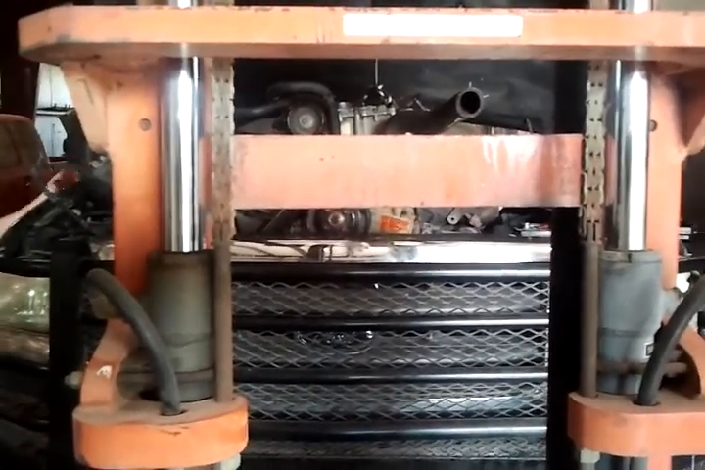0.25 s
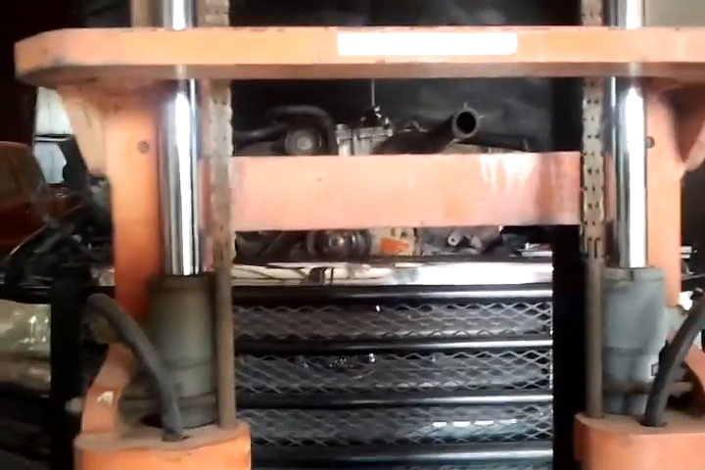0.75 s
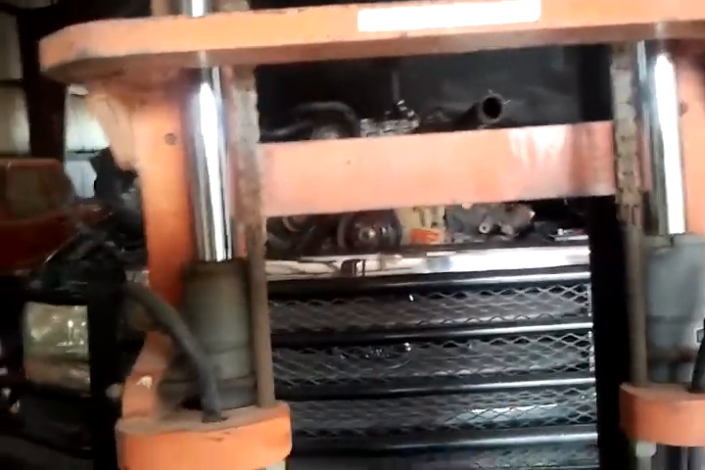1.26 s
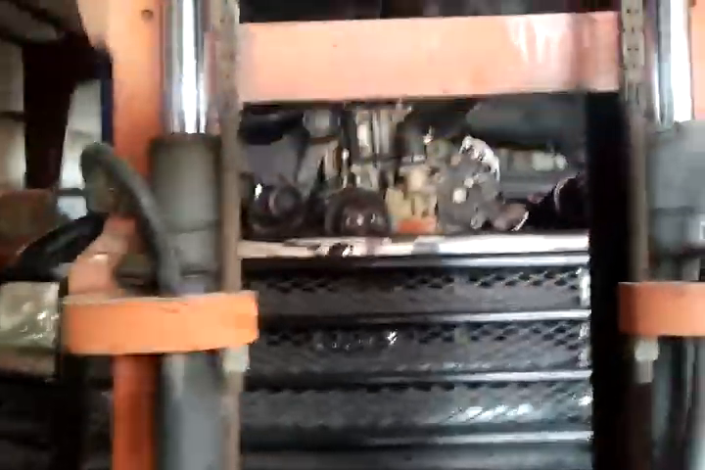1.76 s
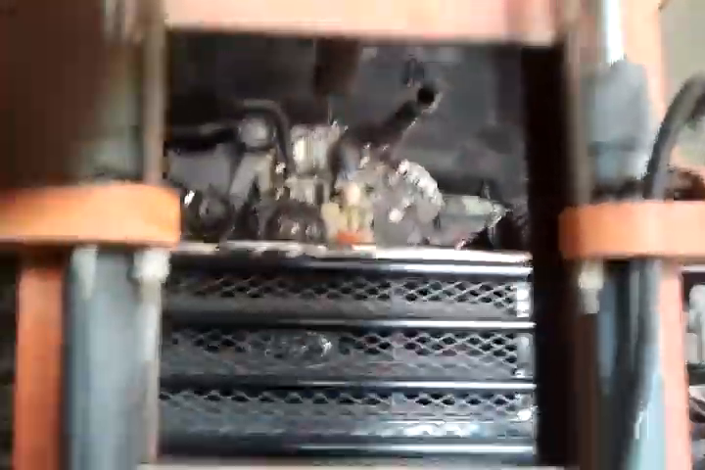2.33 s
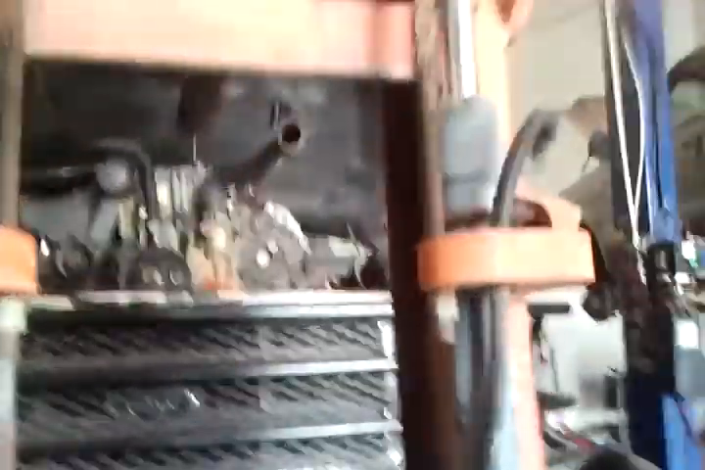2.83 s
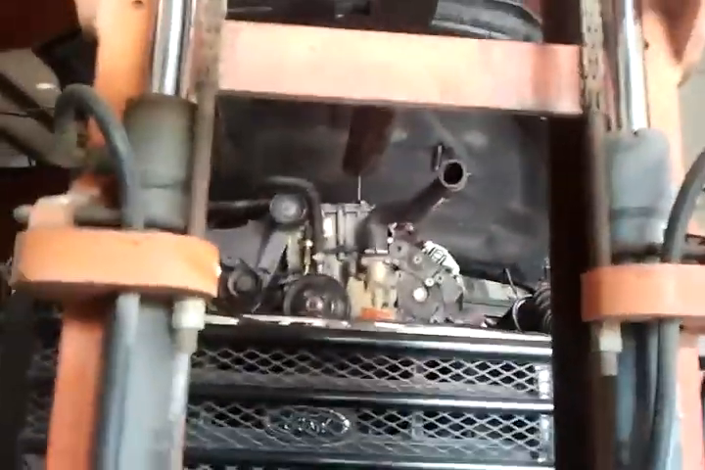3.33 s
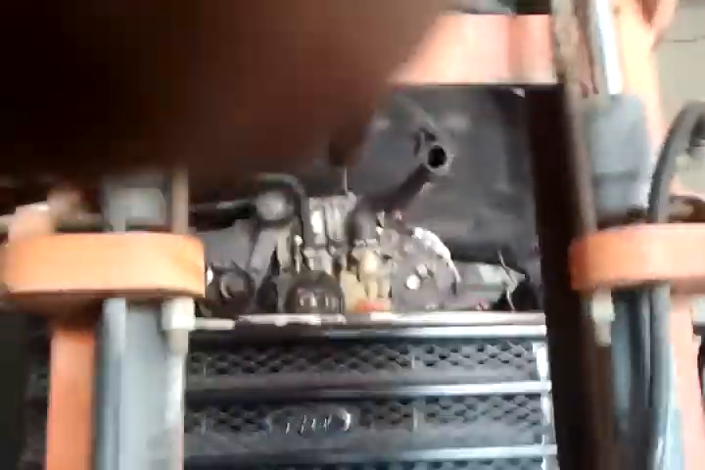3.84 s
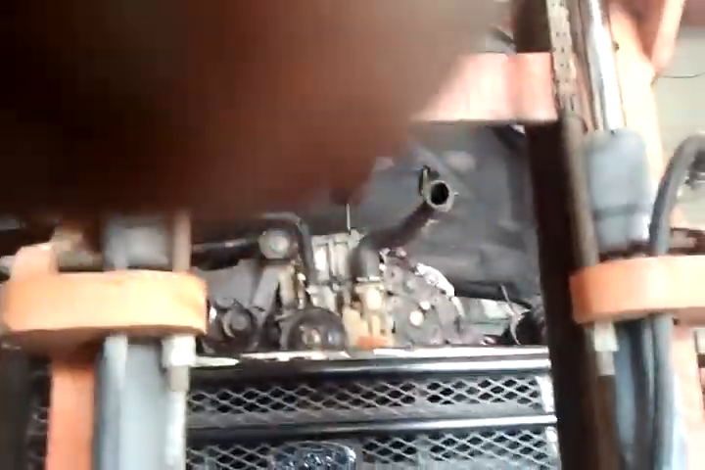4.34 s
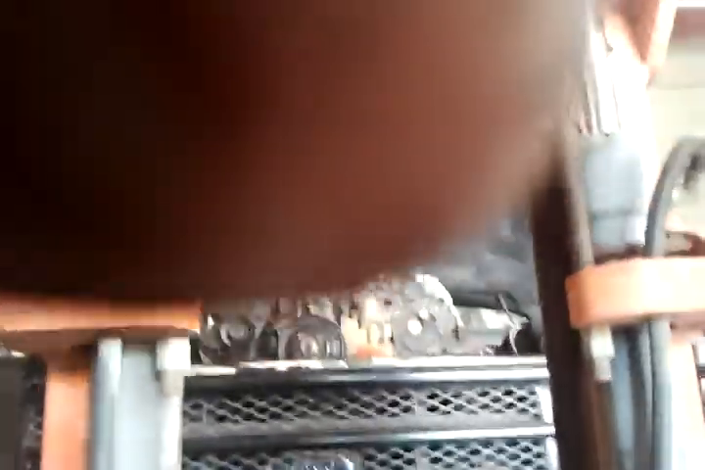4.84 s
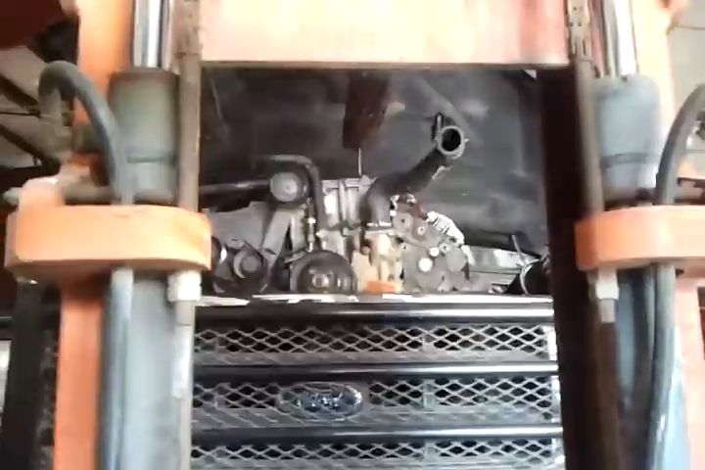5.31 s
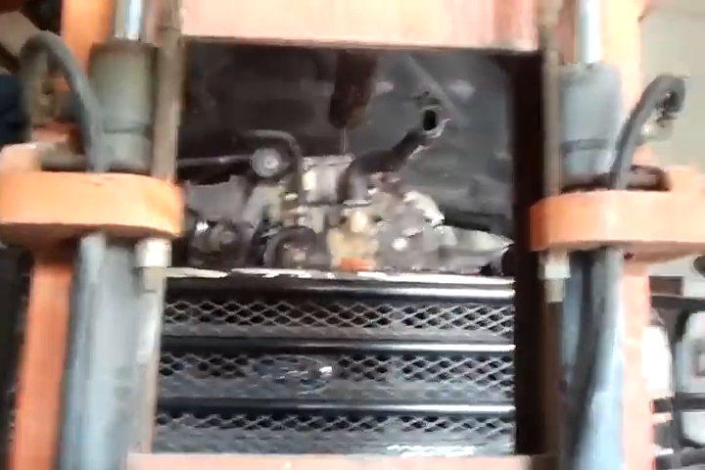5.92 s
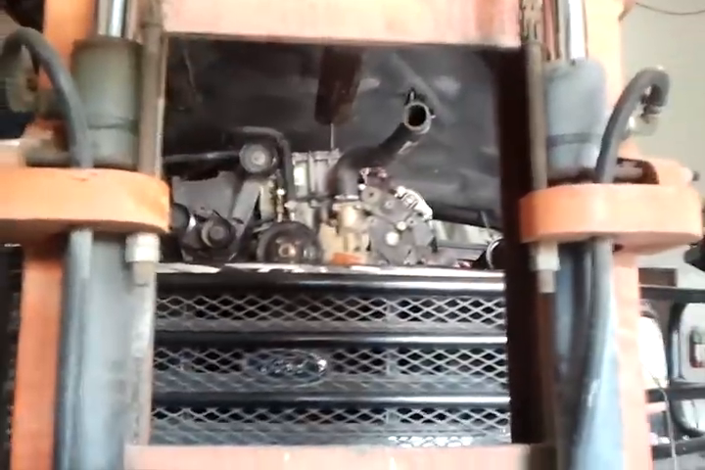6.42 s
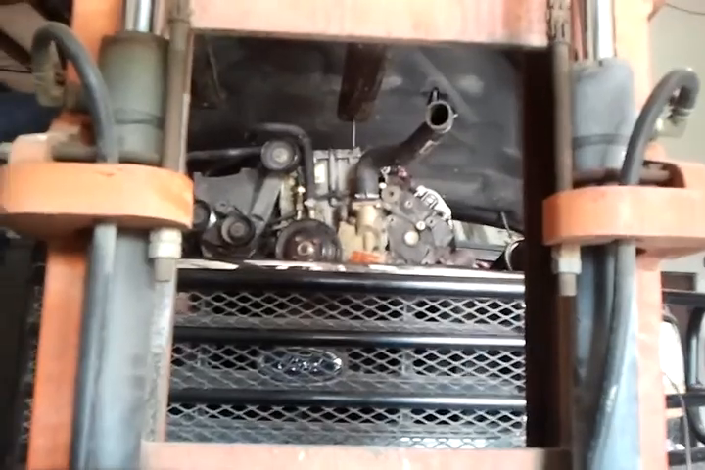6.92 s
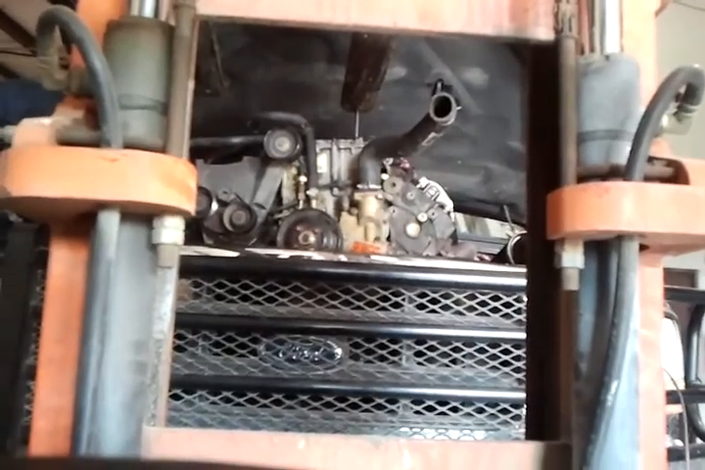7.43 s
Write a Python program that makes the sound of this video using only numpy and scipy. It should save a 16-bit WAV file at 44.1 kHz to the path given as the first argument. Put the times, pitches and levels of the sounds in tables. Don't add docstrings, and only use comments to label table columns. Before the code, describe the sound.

A forklift engine holds a steady fast idle, heard close to its grille on a handheld phone in a workshop. Low firing hum, beating fan note and hydraulic pump whine blend under a broad roar of cooling air. The tone shifts slightly as the hand moves, with hiss briefly brightening around two and five seconds. Near six seconds the sound drops to silence, then fades back unchanged.

```python
import sys
import numpy as np
from scipy import signal
from scipy.fft import rfft, irfft, next_fast_len
from scipy.io import wavfile
from scipy.ndimage import uniform_filter1d, map_coordinates

SR = 44100
rng = np.random.default_rng(int(sys.argv[2]) if len(sys.argv) > 2 else 0)


def int16_out(signal):
    q = np.round(np.clip(np.atleast_2d(signal).T, -1, 1) * 32767)
    wavfile.write(sys.argv[1], SR, q.astype(np.int16))


def magnitude_from_level(level_db):
    exponent = np.asarray(level_db, float) / 20
    return 10 ** exponent


N = 338247
TIME = np.arange(N) / SR

FIRING, FAN, PUMP = 4, 11.39, 22.5

# start_s, end_s
HEARD_SPANS = [
    (0, 5.9133),
    (6.5632, 7.67),
]
# time_s, camshaft_turns_per_minute
CAM_SPEED = [(0.0, 1059), (0.28, 1064), (0.84, 1064), (1.13, 1054), (1.41, 1057), (1.97, 1055.5),
             (2.25, 1045), (2.81, 1049), (3.18, 1058), (3.66, 1050), (4.22, 1050.5), (4.78, 1063),
             (5.35, 1059), (5.91, 1062), (6.84, 1067), (7.12, 1057), (7.39, 1064.5), (7.67, 1053)]
WEAK_ORDERS = (5, 7, 9, 10, 11, 13, 14, 15, 16, 18, 21, 23, 24, 25, 27, 28, 29, 30, 32, 33, 38, 39, 40, 43,
               44, 46, 49, 52, 53, 54, 56, 57, 61, 63, 65, 68, 76.5, 80, 108, 150)
WEAK_ORDER_DB = (-49, -56, -52, -48, -46, -52, -46, -39, -40, -47, -53, -46, -53, -51, -51, -51, -51, -51,
                 -52, -48, -49, -51, -49, -48, -50, -52, -52, -51, -52, -49, -51, -50, -54, -55, -55, -52,
                 -49, -53, -52, -52)
# frequency_hz, level_db_per_hz
AIR_SPECTRUM = [(20, -31.5), (45, -25.5), (80, -13.5), (130, -8), (175, -1.5), (250, 5), (310, -2),
                (520, 0), (700, -3), (1100, -5), (1700, -8.5), (3000, -10), (5000, -12), (8000, -13)]
# frequency_hz, width_hz, gain_db
BAY_CAVITIES = [(580, 20, 3), (914, 60, 2.5), (1368, 80, 2), (1970, 110, 2.5), (2665, 360, 4.5),
                (3430, 160, 2), (3840, 230, 2), (4890, 80, 2), (6260, 290, 2), (7530, 200, 3.5),
                (1490, 75, 1.5), (2380, 80, 3), (5500, 80, 0)]
# delay_ms, level_db
ECHOES = [(2.9, -20), (6.3, -19), (10.7, -18), (17.9, -17), (27.3, -17)]
# time_s, turn_to_air_stream, height_over_grille, depth_into_mast
HAND_PATH = [(0.3, -.23, -0.077, -.38), (1.55, -.33, -0.035, -.3), (1.75, -.29, -.03, -0.43),
             (2.05, -0.19, .48, -0.05), (2.3, .02, .49, -.22), (2.45, 0.034, .56, 0.35),
             (3.0, .06, .23, 0.077), (3.3, .11, .02, 0.31), (3.8, -.03, .17, -0.035),
             (4.0, 0.25, .12, -.23), (4.35, .25, .15, .02), (4.6, 0.24, -.44, .39), (4.9, .28, -.4, .27),
             (5.2, 0.52, -0.18, 0.26), (5.75, 0.71, -0.079, 0.2), (6.9, -.43, .16, .08),
             (7.05, -0.42, .06, .6), (7.5, -0.36, .1, .38)]
# mean_level_db, turn_db_per_unit, height_db_per_unit, depth_db_per_unit
FIRING_NOTE = (-37.5, -1.3, -4.5, 3.5)
FIRING_OCTAVE = (-46.5, 3.7, 3, 10.5)
FIRING_THIRD = (-25, -2.7, -0.5, 2.3)
FAN_NOTE = (-25, 4.5, 7.5, -3.5)
FAN_OCTAVE = (-38.5, -3.5, -5, -1)
PUMP_NOTE = (-28.5, .3, 0, 8.5)
PUMP_OCTAVE = (-30.5, -.3, 11, 0.1)
# time_s, half_length_s, gain_db
FAN_NODES = [(0.23, .2, -1.5), (3.42, .22, -4), (4.65, .2, -1), (5.25, .17, -8), (5.8, .25, -6.5),
             (7.11, .14, -3)]
BEAM_HZ = (570, 1250, 2300, 4400, 6400, 7800)
BEAMING = [(-0.1, -1.1, 1.5), (-.5, 0.5, .6), (3.5, 6.5, .6), (8.5, -1.7, .3), (7.5, 0.5, 1.1),
           (5.5, 5, 5.4)]
# time_s, half_length_s, gain_db
FINGER_SLIDES = [
    (1.953, .15, 3),
    (2.38, .2, 1.1),
    (5.067, 0.25, 6.5),
]
# time_s, level_db
SHORT_HISS = [(5.914, -43.5), (5.94, -41), (5.96, -46.5), (5.977, -48), (5.985, -61.5), (5.992, -87),
              (6.0, -95)]
# frequency_hz, gain_db
PHONE_TOP = [(7200, 0), (7900, -6), (8500, -17), (8900, -33), (9150, -42.5), (9300, -68), (9600, -120)]


def curves(table):
    s, *columns = np.transpose(table)
    return [np.interp(TIME, s, column) for column in columns]


def colour(points, hz):
    f, db = np.transpose(points)
    return np.interp(np.log(hz + 1), np.log(f), db)


def walk(rate_hz):
    hold = int(SR / rate_hz)
    steps = np.repeat(rng.standard_normal(N // hold + 1), hold)
    return 1.83 * uniform_filter1d(uniform_filter1d(steps, hold), hold)[:N]


def bumps(events):
    return sum(db * np.clip(1 - abs(TIME - s) / half, 0, 1) for s, half, db in events)


def after_dropout(length_s):
    resumed_s = TIME - HEARD_SPANS[1][0]
    return (TIME > HEARD_SPANS[0][1]) * np.clip(1 - resumed_s / length_s, 0, 1)


def level_at_hand(note):
    return note[0] + np.dot(note[1:], curves(HAND_PATH))


def tone(turns, db):
    return np.sqrt(2) * magnitude_from_level(db) * np.sin(2 * np.pi * turns)


def camshaft():
    turns = np.cumsum(curves(CAM_SPEED)[0]) / (60 * SR)
    late = TIME >= HEARD_SPANS[1][0]
    return turns - late * turns[np.argmax(late)], late


def engine(turns):
    firing_db = level_at_hand(FIRING_NOTE) + 2 * after_dropout(.5)
    third_db = level_at_hand(FIRING_THIRD) + .4 * bumps(FAN_NODES)
    out = tone(FIRING * turns + rng.random(), firing_db)
    out += tone(2 * FIRING * turns + rng.random(), level_at_hand(FIRING_OCTAVE))
    out += tone(3 * FIRING * turns, third_db + .4 * walk(9))
    swell_db = third_db - np.median(third_db)
    for order, db in zip(WEAK_ORDERS, WEAK_ORDER_DB):
        phase = rng.random() + .05 * walk(4)
        out += tone(order * turns + phase, db + swell_db + 2.5 * walk(3))
    return out


def fan(turns, late):
    db = level_at_hand(FAN_NOTE) + bumps(FAN_NODES)
    blade = FAN * turns + np.where(late, .45, .66)
    out = tone(blade + .015 * walk(6), db + .6 * walk(9))
    out += tone(2 * blade, level_at_hand(FAN_OCTAVE) - 0.5)
    swell_db = np.minimum(db - np.median(db) + 6, 0)
    return out + tone(3 * blade + .08 * walk(4), swell_db - 41 + 2.5 * walk(4))


def pump(turns, late):
    fade = after_dropout(.3)
    db = level_at_hand(PUMP_NOTE) - 2 * fade
    octave_db = level_at_hand(PUMP_OCTAVE) + 4.5 * fade
    lead = np.where(late, .2, .42)
    teeth = PUMP * turns + lead + .008 * walk(30)
    levels_db = (db, octave_db, .5 * octave_db - 26, .5 * octave_db - 36)
    out = 0
    for k, level_db in enumerate(levels_db):
        out += tone((k + 1) * teeth, level_db + 1.2 * walk(10))
    return out


def roar(turns):
    size = next_fast_len(N)
    hz = np.arange(size // 2 + 1) * SR / size
    db = colour(AIR_SPECTRUM, hz)
    db = db + sum(gain / (1 + (2 * (hz - f) / width) ** 2) for f, width, gain in BAY_CAVITIES)
    noise = rfft(rng.standard_normal(size)) * magnitude_from_level(db)
    beam_db = np.dot(BEAMING, curves(HAND_PATH))
    beam_db[-2:] += bumps(FINGER_SLIDES)
    valves = sum(np.cos(2 * np.pi * (k * turns + rng.random())) for k in range(2, 5))
    teeth = np.cos(2 * np.pi * PUMP * turns)
    octave = np.log2(hz + 1)
    out = 0
    for centre in np.arange(5, 13.3, .25):
        band = irfft(noise * np.clip(1 - 4 * abs(octave - centre), 0, 1), size)[:N]
        place = np.interp(centre, np.log2(BEAM_HZ), np.arange(len(BEAM_HZ)))
        low = min(int(place), len(BEAM_HZ) - 2)
        move_db = beam_db[low] + (place - low) * (beam_db[low + 1] - beam_db[low])
        top = np.clip(centre - 12.7, 0, 1)
        throb_db = 0.22 * np.clip(centre - 9.5, 0, 1) * valves + 7.3 * top * teeth
        out = out + band * magnitude_from_level(move_db + throb_db + 0.2 * walk(25))
    return out / np.median(abs(out)) * magnitude_from_level(-24.0)


def echoes(x):
    out = x
    for ms, db in ECHOES:
        lag = (ms + .12 * walk(1.5)) * SR / 1000
        out = out + magnitude_from_level(db) * map_coordinates(x, [np.arange(N) - lag], order=3, mode="wrap")
    return out / np.sqrt(1 + np.sum(magnitude_from_level(np.array(ECHOES)[:, 1]) ** 2))


def scene():
    turns, late = camshaft()
    hum = engine(turns) + fan(turns, late) + pump(turns, late)
    hush_db = -3.5 * after_dropout(.14)
    air = magnitude_from_level(hush_db) * echoes(roar(turns))
    return (hum + air)[None]


def band_limit(x):
    return signal.sosfilt(signal.butter(12, 9080, fs=SR, output="sos"), x)


def record(dry):
    on = sum((TIME >= start) & (TIME <= end) for start, end in HEARD_SPANS)
    on = on * magnitude_from_level(-11 * after_dropout(.22))
    hissing = (TIME > HEARD_SPANS[0][1]) * (TIME < SHORT_HISS[-1][0])
    hiss = hissing * magnitude_from_level(curves(SHORT_HISS)[0]) * 1.6 * rng.standard_normal(N)
    size = next_fast_len(N)
    hz = np.arange(size // 2 + 1) * SR / size
    sound = rfft(dry * on + hiss, size)
    fold = int(16000 / 2 * size / SR)
    sound *= np.cos(np.pi / 4 * np.clip(1 + (hz - hz[fold]) / 200, 0, 2))
    sound[:, 1:2 * fold] += np.conj(sound[:, 2 * fold - 1:0:-1])
    heard = irfft(sound * magnitude_from_level(colour(PHONE_TOP, hz)), size)[:, :N]
    return band_limit(heard)


dry = scene()
out = record(dry)
int16_out(out)
```